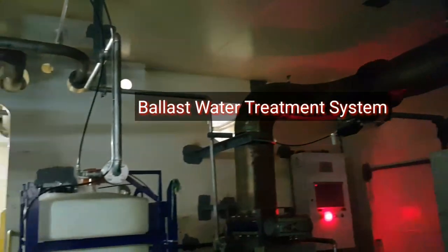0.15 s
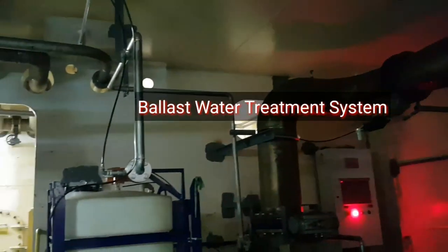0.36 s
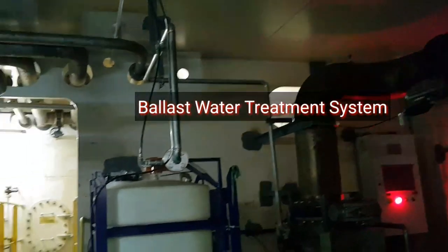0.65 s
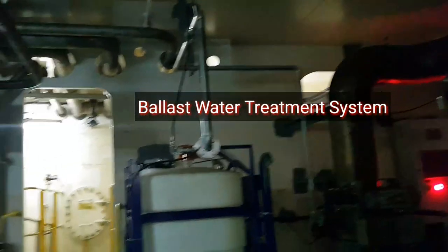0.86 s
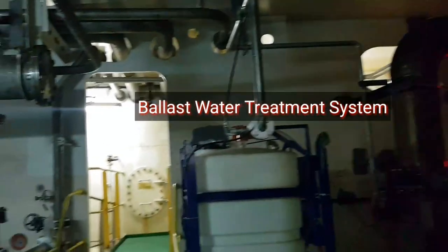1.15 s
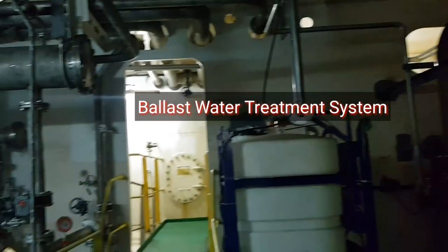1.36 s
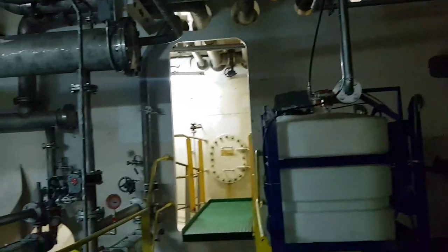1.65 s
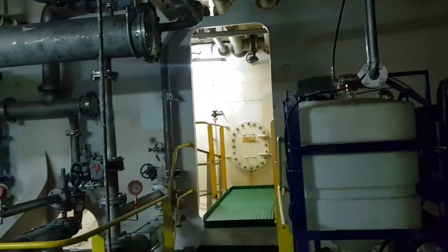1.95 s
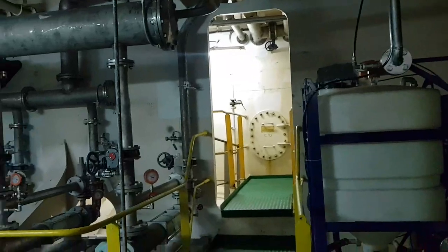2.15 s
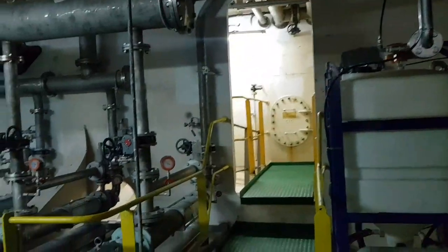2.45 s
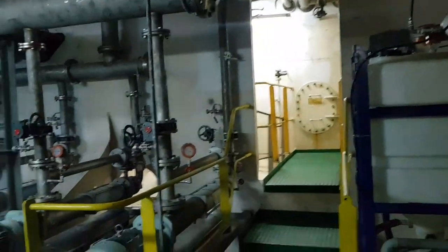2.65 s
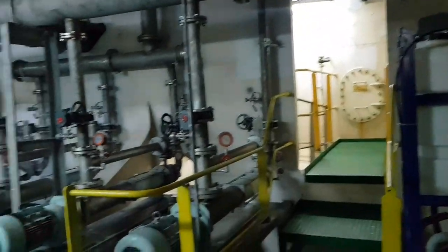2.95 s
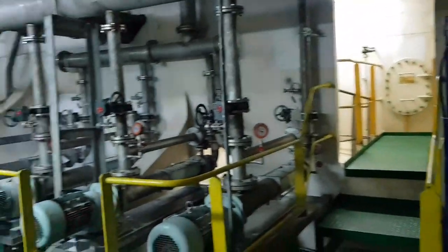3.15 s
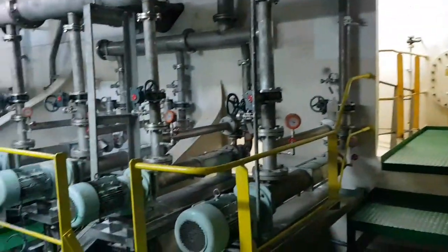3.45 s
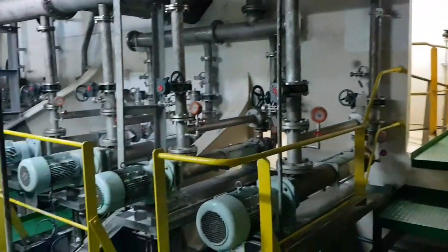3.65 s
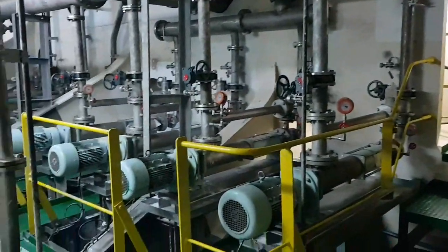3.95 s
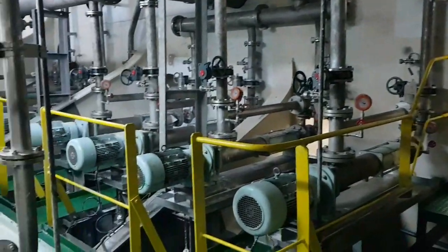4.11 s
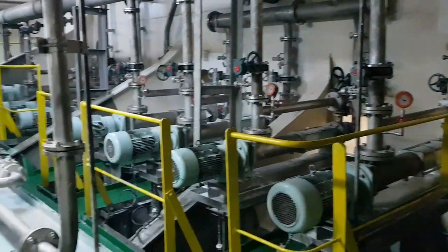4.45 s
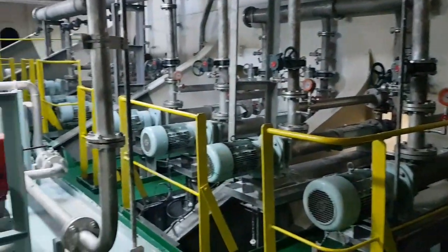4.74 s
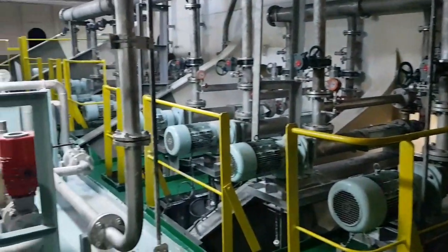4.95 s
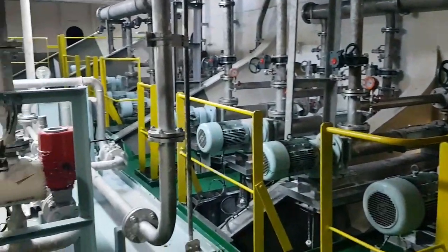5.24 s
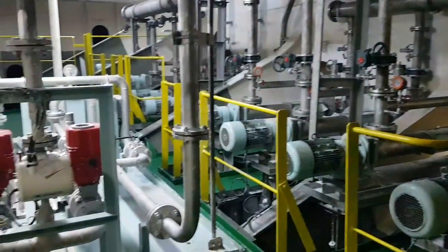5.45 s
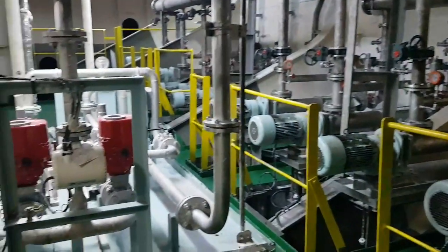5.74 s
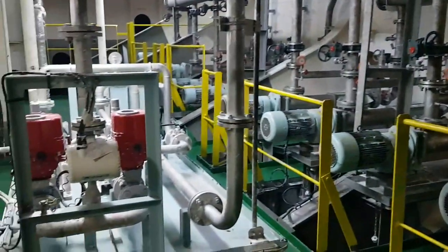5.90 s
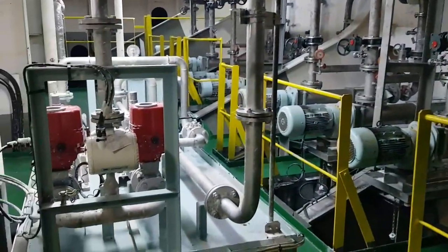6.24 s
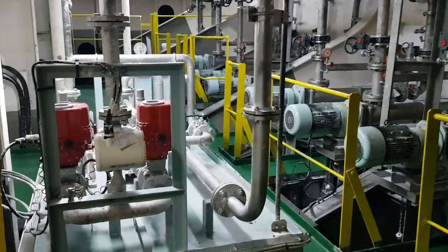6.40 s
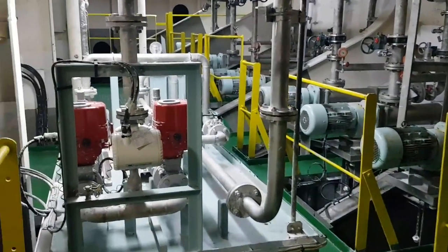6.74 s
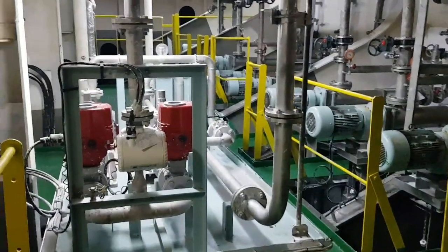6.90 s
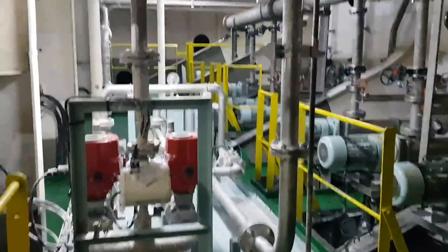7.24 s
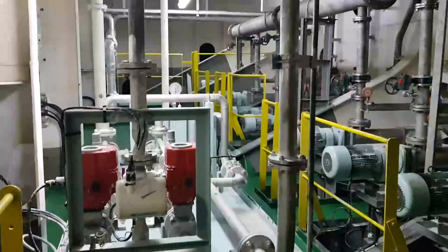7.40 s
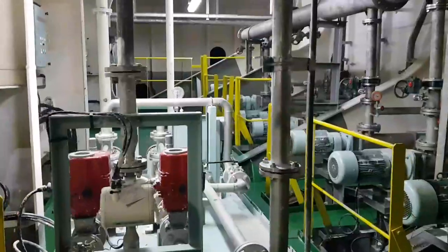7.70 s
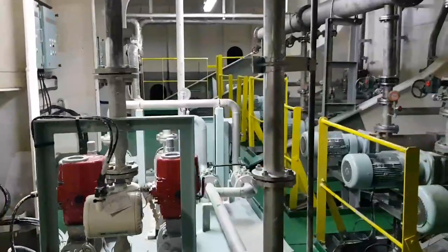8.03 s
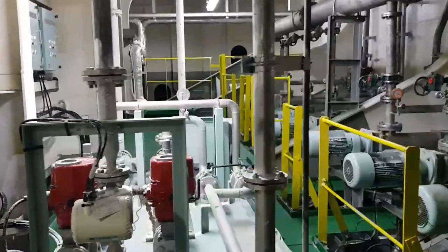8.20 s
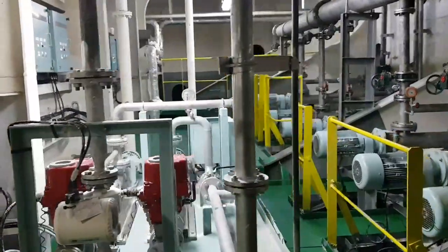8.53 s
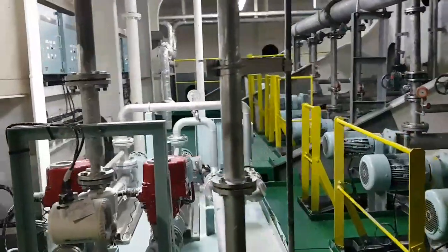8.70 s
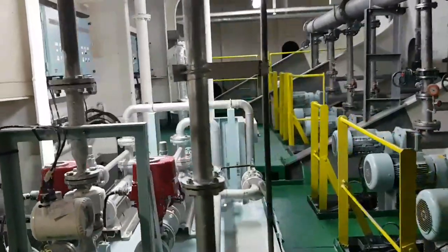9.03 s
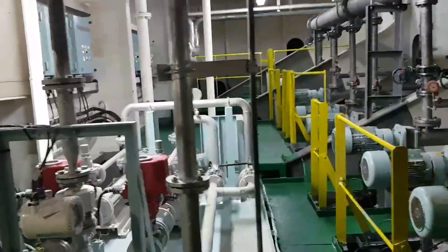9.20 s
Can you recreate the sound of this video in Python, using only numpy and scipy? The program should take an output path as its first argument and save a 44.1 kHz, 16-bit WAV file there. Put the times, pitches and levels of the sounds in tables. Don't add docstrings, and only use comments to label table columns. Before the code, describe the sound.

Dense machinery rumble and ventilation rush fill a steel space while pump tones swell and beat as the listener moves; a sole briefly scrapes late on.

```python
import sys
import numpy as np
from scipy import signal
from scipy.fft import rfft, irfft, next_fast_len
from scipy.io import wavfile
from scipy.ndimage import uniform_filter1d, minimum_filter1d

SR = 44100
rng = np.random.default_rng(int(sys.argv[2]) if len(sys.argv) > 2 else 0)


def wav_record(signal):
    frames = np.transpose(np.atleast_2d(signal))
    bounded = np.clip(frames, -1, 1)
    quanta = np.round(bounded * 32767).astype(np.int16)
    wavfile.write(sys.argv[1], SR, quanta)


def level_to_linear(level):
    exponent = np.asarray(level, float) / 20
    return 10 ** exponent


N = 412776
TIME = np.arange(N) / SR
STEP = 128
SLOW_TIME = np.arange(0, N + STEP, STEP) / SR
TURN_HZ = 1.3232

# (frequency [Hz], likeness [0-1])
COHERENCE = [(60, .995), (160, .97), (300, .94), (480, .74), (700, .67), (970, .42), (1300, .25),
             (3000, .28), (6000, .17), (14000, .1)]


def main_engine():
    # (frequency [Hz], width [Hz], lag [s], extra travel from each next cylinder [s])
    hull_modes = [(27, 6.1, 0.12, 0.0095), (36.8, 3, 0.064, -0.0035), (49.5, 6.7, 0.1035, .0),
                  (57.6, 5.7, 0.1014, -0.0043), (81.46, 5.5, .08, -.0045), (119.1, 8.8, 0.0489, .0)]
    cylinder_blows = [(-35, -34, -25, -33, -25, -34), (-50, -38, -38, -36, -29, -34),
                      (-36, -50, -29, -34, -26, -30), (-50, -50, -28, -33, -25, -38),
                      (-38, -50, -19.5, -35, -40, -34), (-50, -44, -32, -33, -36, -30)]
    early = 12
    count = int(N / SR * TURN_HZ * 6) + early
    order = np.arange(count) - early
    cylinder = order % 6
    scatter = rng.standard_normal((count, len(hull_modes)))
    pad = 2 * SR
    out = 0
    for m, (hz, width_hz, lag, travel) in enumerate(hull_modes):
        firing_s = lag + order / 6 / TURN_HZ + cylinder * travel
        at = (firing_s * SR).astype(int) + pad
        blows = np.zeros(N + pad + SR, complex)
        blows[at] = level_to_linear(np.array(cylinder_blows)[cylinder, m] + 2.0 * scatter[:, m])
        pole = np.exp((2j * np.pi * hz - np.pi * width_hz) / SR)
        once = signal.lfilter([1], [1, -pole], blows)
        twice = signal.lfilter([np.e * np.pi * width_hz / SR], [1, -pole], once)
        out = out + twice.imag
    left = out[pad - 22:pad - 22 + N] * level_to_linear(-1.6)
    right = out[pad:pad + N] * level_to_linear(1.6)
    return np.array([left, right])


def exhaust_pulse():
    return (.5 + .5 * np.cos(2 * np.pi * (3 * TURN_HZ * TIME - .35))) ** 1.5


def vane_pump():
    # (time [s], half length [s], left level [dB], right level [dB])
    hum_spots = [
        (2.0, .45, -30, -23),
        (2.59, .24, -27, -20),
        (3.94, .3, -30, -27),
        (5.95, .9, -31, -25),
        (7.38, .22, -28, -25),
        (8.75, .23, -20.5, -16),
        (8.97, .84, -23.5, -17.5),
    ]
    # (time [s], half length [s], left
    # level [dB], right level [dB])
    third_spots = [(0.32, 0.65, -45.5, -31), (2.36, 0.14, -43, -30), (3.14, 0.45, -55, -60),
                   (3.26, 1.0, -55, -26), (4.37, 0.26, -43, -27), (5.03, 0.26, -39, -23),
                   (5.81, 0.2, -40.5, -23.5), (6.44, 0.19, -38, -24), (7.27, 0.29, -38, -26.5),
                   (8.04, 0.4, -37.5, -29), (9.15, 0.26, -34, -22.5)]
    return pump(166.45, hum_spots, third_spots, multiple=3, wander=.1, turn=0)


def gear_pumps():
    # (time [s], half length [s], left level [dB], right level [dB])
    low_spots = [(0.65, 0.55, -37, -36), (1.36, 0.071, -46, -26.5), (1.74, 0.095, -27, -37),
                 (2.72, 0.82, -39, -35.5), (3.11, 0.16, -31, -30.5), (3.84, 0.1, -40, -26),
                 (4.06, 0.16, -29.5, -38), (4.45, 0.1, -35, -22.5), (4.68, 0.13, -30, -31),
                 (5.12, 0.12, -28.5, -23), (5.43, 0.17, -35, -28.5), (5.82, 0.1, -27, -37),
                 (6.09, 0.12, -28, -23), (6.72, 0.27, -28, -36), (6.73, 0.11, -36, -22.5),
                 (7.67, 0.17, -34.5, -25.5), (8.15, 0.063, -27, -24.5), (8.45, 0.066, -54, -21),
                 (8.63, 0.22, -39, -45), (9.1, 0.12, -45, -39)]
    low_second_spots = [(0.56, 0.98, -47, -44), (1.28, 0.16, -46, -47), (2.29, 0.43, -51, -60),
                        (2.32, 0.13, -60, -34), (3.06, 0.23, -60, -32.5), (3.25, 0.14, -38, -51),
                        (3.64, 0.14, -40, -35), (4.35, 0.27, -41, -39), (6.36, 0.85, -44, -40.5),
                        (6.99, 0.18, -37, -37), (7.52, 0.093, -43, -42), (8.27, 0.18, -34.5, -46),
                        (9.11, 0.26, -41, -37.5)]
    high_spots = [(-0.01, 0.17, -46, -31.5), (0.75, 0.54, -35, -33.5), (1.59, 0.42, -39, -59.5),
                  (1.97, 0.12, -41, -31), (2.27, 0.15, -29, -38), (2.86, 0.3, -45, -29.5),
                  (3.86, 0.45, -28, -60), (5.11, 0.57, -42, -39), (6.46, 0.66, -43, -31),
                  (8.64, 0.99, -29, -49), (9.01, 0.12, -40, -60)]
    high_second_spots = [(-0.01, 0.11, -48, -49), (0.9, 0.11, -37, -60), (1.57, 1, -42, -40),
                         (2.38, 0.12, -43, -44), (3.25, 0.26, -46, -48), (4.58, 1.0, -45, -38.5),
                         (6.36, 1.0, -48, -51), (7.3, 0.2, -60, -41), (8.02, 0.17, -40, -49),
                         (8.38, 0.11, -54, -39), (9.13, 0.23, -41, -48)]
    turn = 1.1
    low = pump(1074.6, low_spots, low_second_spots, multiple=2, wander=.25, turn=turn)
    return low + pump(1085.2, high_spots, high_second_spots, multiple=2, wander=.35, turn=turn)


def pump(hz, spots, upper_spots, multiple, wander, turn):
    first = tone(hz, *passing(spots), 0.88, wander, turn)
    return first + tone(multiple * hz, *passing(upper_spots), 0.93, multiple * wander)


def motors():
    # (frequency [Hz], left level [dB rms], right level [dB rms])
    motor_tones = [(118.6, -36, -32), (135.5, -39, -33), (236.9, -39, -33), (270.2, -41, -34),
                   (333, -43, -35), (355.3, -42, -36), (394.3, -49, -42), (592.2, -45, -42),
                   (665.8, -48, -45), (908.4, -44, -42), (923.9, -47, -46), (1078.2, -51, -46),
                   (1241.5, -55, -52), (1590.1, -54, -49), (2141.2, -57, -50), (2155.5, -52, -50),
                   (2605.5, -58, -65), (2886, -66, -69), (3244.8, -59, -64), (3528, -64, -72),
                   (3710, -64, -70), (4341.6, -61, -63), (4492, -70, -68), (5584.5, -75, -82),
                   (14209, -81, -94)]
    return sum(tone(*row, fade_db=2.5, wander=.4) for row in motor_tones)


def turbocharger():
    # (time [s], half length [s], left level [dB], right level [dB])
    lower_spots = [
        (.85, .5, -54, -71),
        (2.1, .15, -57, -72),
        (3.3, .55, -56, -73),
        (4.8, 0.18, -60, -75),
        (6.0, .35, -56, -75),
        (7.5, .35, -58, -78),
        (9.0, .3, -59, -78),
    ]
    upper_spots = [
        (.9, .7, -58, -72),
        (2.15, .2, -52, -70),
        (3.3, .5, -56, -71),
        (4.9, .25, -56, -72),
        (5.8, .3, -57, -74),
        (7.1, .6, -56, -79),
        (9.0, .5, -58, -80),
    ]
    blade_hz, shaft_hz = 10889, 186
    flutter_db = 4.0 * np.tanh(drift(6.0, channels=2))
    between_db = -66 - np.array([[0], [17]])
    lower_db = passing(lower_spots, between_db) + flutter_db[0]
    upper_db = passing(upper_spots, between_db) + flutter_db[1]
    return tone(blade_hz, *lower_db, 1.5, 1.2) + tone(blade_hz + shaft_hz, *upper_db, 1.5, 1.8)


def gear_meshes():
    # (mesh [Hz], shaft [Hz], left level [dB], right level [dB], fall per side tone [dB])
    tooth_tones = [(3135.5, 11.5, -55.5, -62.5, 2.2), (4214.5, 8, -59, -67, 2.5),
                   (10980, 93, -70, -88, 1.5)]
    out = 0
    for hz, shaft_hz, left_db, right_db, fall_db in tooth_tones:
        shaft = 2 * np.pi * shaft_hz * TIME
        load = 1
        for k in range(1, 6):
            depth = 2 * level_to_linear(-fall_db * k + 2 * np.tanh(rng.standard_normal()))
            load = load + depth * np.cos(k * shaft + 2 * np.pi * rng.random())
        out = out + load * tone(hz, left_db, right_db, 2.2, .6)
    return out


def squeak():
    # (time [s], length [s], frequency [Hz], half width [Hz], left level [dB], right level [dB])
    rubber_slip = (8.03, .085, 2700, 70, -42, -49)
    s, length, hz, width_hz, left_db, right_db = rubber_slip
    sos = signal.butter(2, [hz - width_hz, hz + width_hz], "band", fs=SR, output="sos")
    rub = signal.sosfilt(sos, rng.standard_normal((2, N)))
    swell = np.exp(-((TIME - s) / length) ** 4)
    return rub / rub.std() * swell * level_to_linear(np.array([[left_db], [right_db]]))


def roar():
    # (frequency [Hz], density [dB per Hz])
    left_spectrum = [(20, -52), (70, -50), (130, -41.5), (170, -44), (400, -49), (850, -60.5),
                     (1600, -63.5), (2600, -70), (4400, -75.5), (7000, -86.5), (8800, -80), (10500, -79.5),
                     (14000, -85.5), (15400, -88)]
    right_spectrum = [(20, -55), (70, -45), (130, -37.5), (250, -39), (630, -51.5), (1600, -57.5),
                      (2000, -61.5), (3000, -81), (4400, -76.5), (6000, -94.5), (8200, -102),
                      (10500, -133.5), (14400, -105), (14900, -119)]
    # (frequency [Hz], width [Hz], level over the roar [dB])
    resonances = [(27, 4, 8), (49, 10, 9), (60, 5, 4), (83, 7, 9), (94, 5, 4), (116, 10, 4.5), (160, 20, 4),
                  (240, 30, 2), (905, 60, 5), (1085, 70, 5), (1620, 200, 2), (2158, 45, 8), (3135, 70, 6),
                  (3248, 25, 6), (3580, 30, 5), (3260, 260, 2), (4220, 140, 5), (4335, 30, 7),
                  (4490, 40, 3), (10950, 500, 2)]
    # (time [s],
    # gain [dB])
    nearness = [
        (0, -3),
        (.3, -0.5),
        (2, -.4),
        (4.3, .5),
        (6.6, -0.06),
        (8, 0.2),
        (8.7, -1.1),
        (9.36, -0.5),
    ]
    # (time [s], length [s], level over the roar [dB])
    scuffs = [
        (8.056, 0.11, 2.6),
    ]
    size = next_fast_len(N)
    hz = np.arange(size // 2 + 1) * SR / size + 1e-3
    shared, left, right = rfft(rng.standard_normal((3, size)))
    alike = np.clip(at_hz(COHERENCE, hz), 0, 1)
    common = np.sqrt(alike) * shared * [np.ones(len(hz)), np.exp(1j * right_phase(hz))]
    pair = common + np.sqrt(1 - alike) * np.array([left, right])
    boost_db = sum(top_db / (1 + (2 * (hz - mode_hz) / width_hz) ** 2)
                   for mode_hz, width_hz, top_db in resonances)
    colour_db = np.array([at_hz(left_spectrum, hz), at_hz(right_spectrum, hz)]) + boost_db
    pair = pair * level_to_linear(colour_db) * np.sqrt(SR / 2) * (hz > 12)

    near_db = np.interp(TIME, *np.transpose(nearness))
    scuff_db = sum(over_db * np.exp(-((TIME - s) / length) ** 4) for s, length, over_db in scuffs)
    middle_db = -0.01 + 0.56 * near_db + scuff_db + .4 * fine(drift(6.0))
    hiss_db = near_db + .6 * scuff_db + .9 * exhaust_pulse() + .5 * fine(drift(12.0))
    surge_db = 1.03 * fine(drift(2.3, channels=2))
    low_db = 0.53 * near_db + scuff_db + surge_db
    deep_db, rumble_db = -0.9 + low_db[0], 0.84 + low_db[1]

    deepest = 1 / (1 + (hz / 90) ** 6)
    deep = 1 / (1 + (hz / 165) ** 4)
    low = 1 / (1 + (hz / 500) ** 4)
    high = 1 / (1 + (3500 / hz) ** 4)
    shares = [(deepest, 0), (deep - deepest, deep_db), (low - deep, rumble_db),
              (1 - low - high, middle_db), (high, hiss_db)]
    return sum(irfft(pair * share, size)[:, :N] * level_to_linear(share_db) for share, share_db in shares)


def tone(hz, left_db, right_db, fade_db, wander, turn=0):
    phase = 2 * np.pi * (hz * TIME + rng.random())
    apart = 1 - np.clip(at_hz(COHERENCE, hz), 0, 1)
    common, own = drift(1.74, channels=2), drift(1.6, channels=4)
    lead = (right_phase(hz) + turn) * np.array([[0], [1]])
    mean_db = np.array([left_db + 0 * SLOW_TIME, right_db + 0 * SLOW_TIME])
    tone_db = mean_db + fade_db * np.tanh(common[0] + apart * own[:2])
    shift = lead + wander * common[1] + .7 * apart * own[2:]
    return fine(np.sqrt(2) * level_to_linear(tone_db)) * np.sin(phase + fine(shift))


def passing(spots, between_db=-57):
    s, length, *peak_db = np.transpose(spots)
    bells = np.exp(-((SLOW_TIME - s[:, None]) / np.maximum(length, .05)[:, None]) ** 2)
    return 10 * np.log10(level_to_linear(np.array(peak_db)) ** 2 @ bells + level_to_linear(between_db) ** 2)


def right_phase(hz):
    # (frequency [Hz], phase [rad])
    casing_lead = [(30, .31), (120, .48), (215, .58), (390, .77), (600, .96), (970, 1.67), (1400, .5),
                   (2200, .0)]
    return at_hz(casing_lead, hz) - 2 * np.pi * hz * .00043


def at_hz(points, hz):
    table_hz, value = np.array(points).T
    return np.interp(np.log(hz), np.log(table_hz), value)


def drift(rate, channels=1):
    knot_hz = 64
    knots = rng.standard_normal((channels, int(N / SR * knot_hz) + 400))
    r = np.exp(-2 * np.pi * rate / knot_hz)
    slow = signal.lfilter([1], [1, -2 * r, r * r], knots)[:, 398:]
    return np.array([np.interp(SLOW_TIME * knot_hz, np.arange(len(k)), k / k.std()) for k in slow])


def fine(slow):
    ramp = np.arange(STEP) / STEP
    lines = slow[:, :-1, None] + np.diff(slow)[:, :, None] * ramp
    return lines.reshape(len(slow), -1)[:, :N]


def scene():
    machines = main_engine() + vane_pump() + gear_pumps() + motors() + turbocharger() + gear_meshes()
    return machines + squeak() + roar()


def low_pass(x):
    return signal.sosfilt(signal.butter(12, 15580, fs=SR, output="sos"), x)


def record(dry):
    over_db = np.maximum(20 * np.log10(np.abs(dry).max(axis=0) + 1e-9) + .3, 0)
    ahead_db = -minimum_filter1d(-over_db, size=301)
    release_db = 45.0 * TIME
    held_db = uniform_filter1d(np.maximum.accumulate(ahead_db + release_db) - release_db, size=301)
    last = np.clip((N - np.arange(N)) / 60, 0, 1)
    return low_pass(dry * level_to_linear(-held_db) * last)


dry = scene()
out = record(dry)
wav_record(out)
```